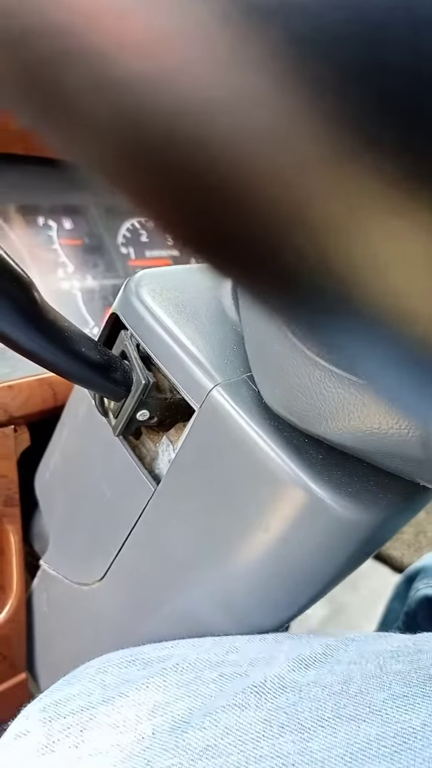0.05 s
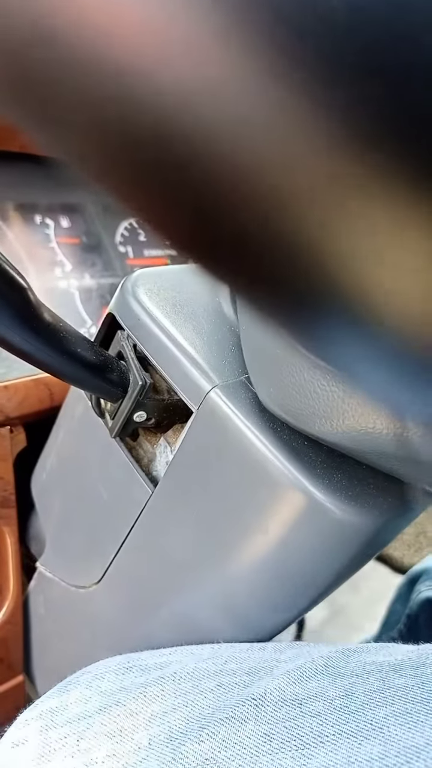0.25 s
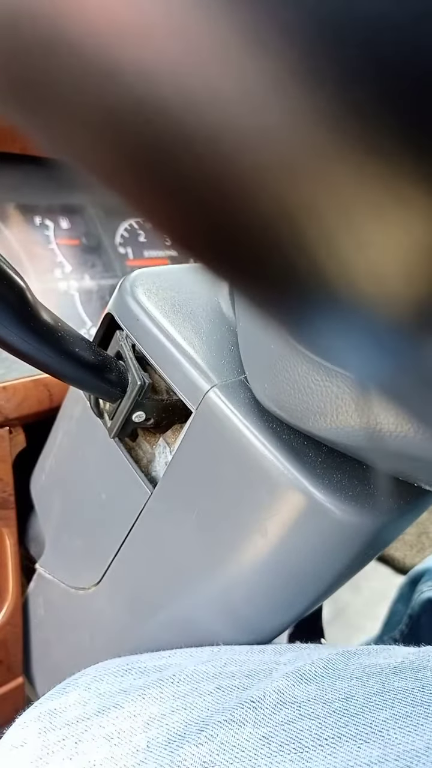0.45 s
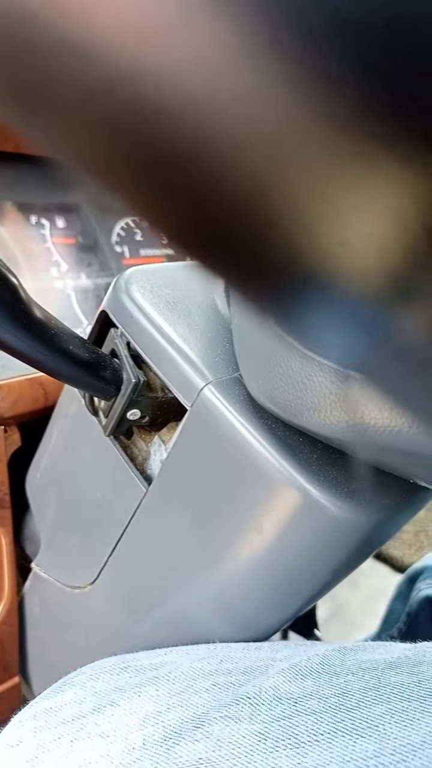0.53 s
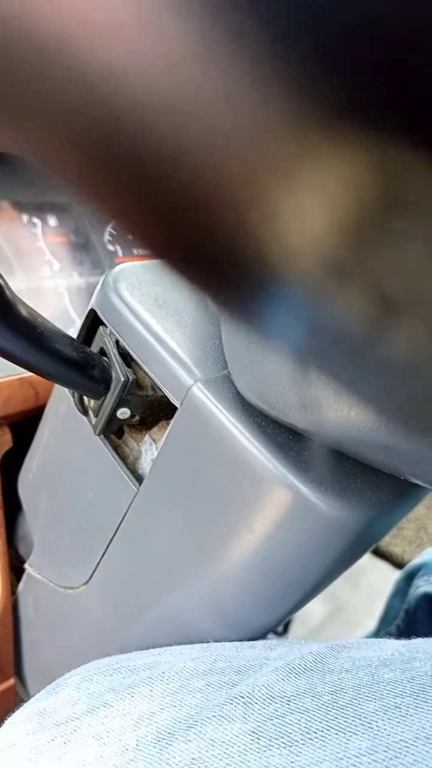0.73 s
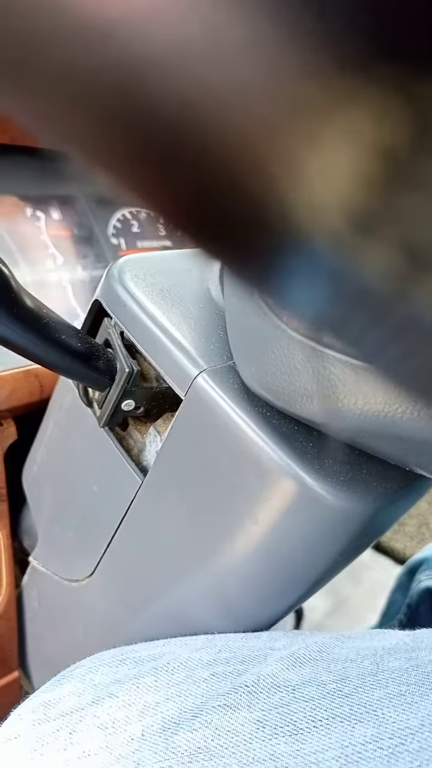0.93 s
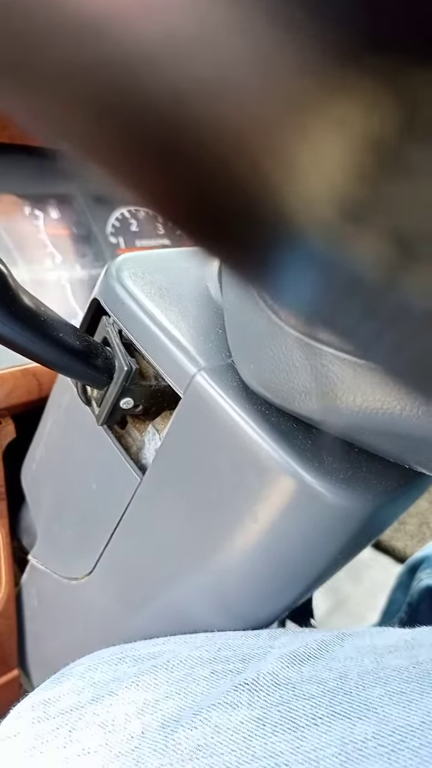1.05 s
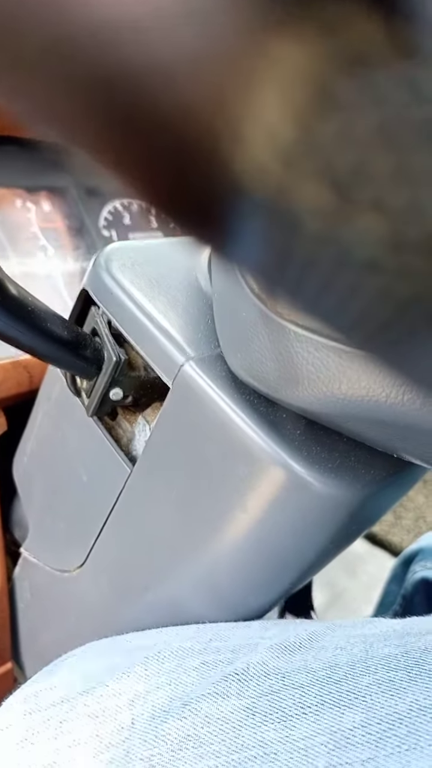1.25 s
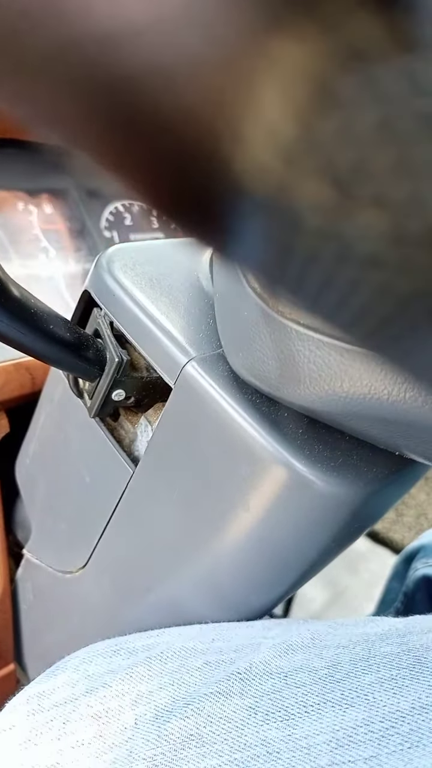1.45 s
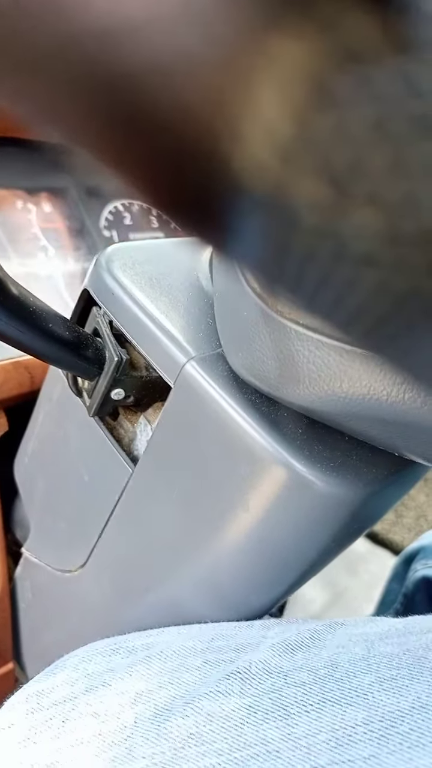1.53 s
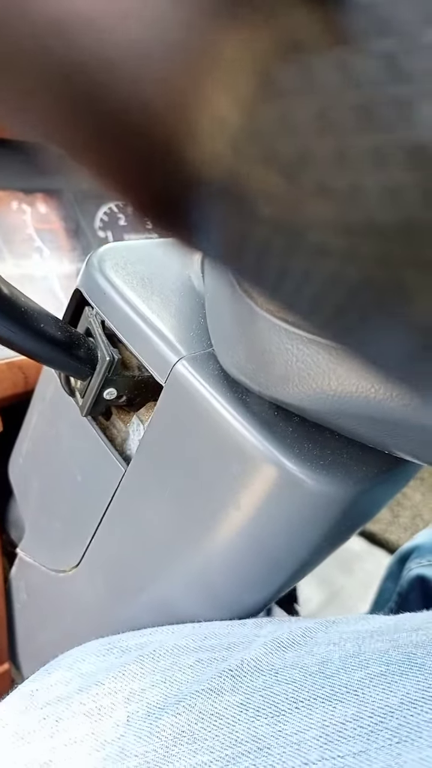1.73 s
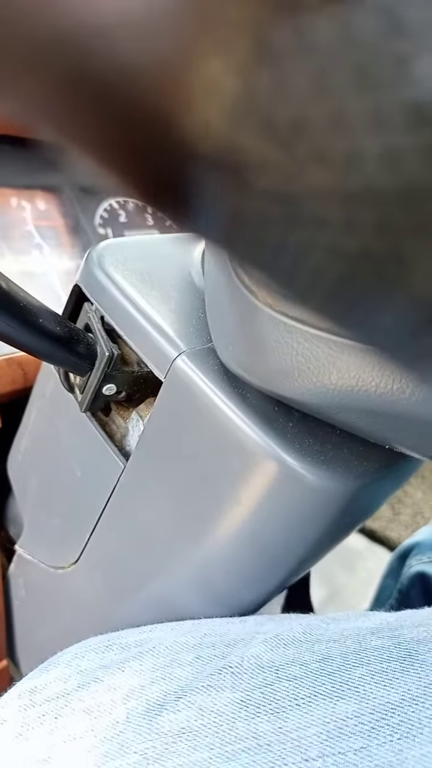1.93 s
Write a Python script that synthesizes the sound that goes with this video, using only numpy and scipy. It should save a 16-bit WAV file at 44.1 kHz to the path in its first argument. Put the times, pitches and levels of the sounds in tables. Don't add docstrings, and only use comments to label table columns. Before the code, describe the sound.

A diesel engine idles throughout, low and clattering, heard inside a vehicle cab; a small crisp switch tick comes early, then a louder plastic lever snap with a thud and quick second knock, close to the microphone.

```python
import sys
import numpy as np
from scipy import signal
from scipy.fft import rfft, irfft, next_fast_len
from scipy.io import wavfile
from scipy.ndimage import uniform_filter1d, map_coordinates

SR = 44100
rng = np.random.default_rng(int(sys.argv[2]) if len(sys.argv) > 2 else 0)


def bounce(signal):
    frames = np.transpose(np.atleast_2d(signal))
    limited = np.clip(frames, -1, 1)
    pcm = np.round(limited * 32767).astype(np.int16)
    wavfile.write(sys.argv[1], SR, pcm)


def invert_db(level):
    return 10 ** (np.asarray(level, dtype=float) / 20)


N = 88200
T = np.arange(N) / SR

# t/s, rumble level/dB
SHAKE = [(0, -36.5), (.12, -43.5), (.25, -33), (.33, -39), (.42, -33), (.55, -43), (.67, -34), (.75, -35.5),
         (.86, -32), (.96, -35.5), (1.15, -40.5), (1.35, -39.5), (1.45, -34.5), (1.58, -39), (1.7, -37.5),
         (1.85, -36.5), (1.93, -40.5), (2, -36)]
# f/Hz, density level/dB per Hz
CABIN_RUMBLE = [(15, -71), (25, 2), (48, -7), (107, 6), (178, -7.5), (220, -4), (314, -3.5), (396, -8),
                (1000, -20), (1300, -21), (2200, -120)]
# f/Hz, density level/dB per Hz
BLOCK_WASH = [(210, -66), (350, 0), (891, -5.5), (1570, -11.5), (1840, -7.5), (3060, -12), (7660, -35.5),
              (12900, -52), (15400, -75)]
CABIN_PATCH_DB = 1
BLOCK_DB, BLOCK_PATCH_DB = -41, 3

# t/s, level/dB
BLOWER_HUM = [(0, -40), (.07, -44), (.22, -38), (.3, -43), (.38, -37.5), (.47, -46), (.56, -34.5),
              (.67, -47), (.72, -38.5), (.86, -38), (.93, -40.5), (1.0, -35.5), (1.15, -49), (1.34, -44.5),
              (1.46, -37.5), (1.69, -39), (1.92, -46), (2, -37.5)]
BLOWER_HZ, BLOWER_OVERTONE_DB = 111.6, -6

# multiple of the firing rate/1, rms level/dB
FIRING_ORDERS = [(4, -45), (5, -41), (6, -51), (8, -49.5), (10, -49), (11, -49.5), (12, -52.5), (13, -55),
                 (14, -49), (15, -47), (16, -55), (18, -59), (21, -56.5), (26, -57.5), (37, -54.5),
                 (47, -55.5)]
FIRING_HZ, FIRST_FIRING_S = 19.16, .0535
TONE_WANDER_DB, TONE_DRIFT_RAD = 1, 0.18
BOOM_SHARE = .7

# t/s, level/dB
BITE = [(0, -2), (.27, 3.5), (.5, -4), (.7, 0), (.9, -3), (1.2, -5), (1.32, 1), (1.53, -1), (1.73, 3.5),
        (1.84, -1), (1.94, 1.5)]
# f/Hz, width/Hz, level/dB
KNOCK_MODES = [(658, 40, 2), (895, 182, 0.5), (1304, 156, 3.5), (2113, 246, -1), (3170, 280, -7),
               (4120, 260, -7)]
CYLINDER_DB = [
    [2, -1, 1, 1],
    [3, -1.2, 0, -0.99],
]
KNOCK_DB, KNOCK_RISE_S, KNOCK_T60_S, KNOCK_SCATTER_DB = -45.5, 0.0051, 0.1, 1.2
VALVE_LAG, VALVE_DB = 0.46, -11.5
BITE_TO_KNOCK = .6

RING_CYLINDER_DB = [0, -9, -7, -7]
RING_HZ, RING_DB, RING_T60_S, RING_WAVER_RAD = 3010, -54, .06, 1.1

# f/Hz, density level/dB per Hz
CLATTER = [(2000, -28), (3500, 2), (5100, -8.5), (7000, -18), (9000, -29.5), (10800, -25.5), (12300, -19.5),
           (13800, -24.5), (15500, -40)]
CLATTER_DB, CLATTER_RISE_S, CLATTER_T60_S = -54.5, 0.0076, 0.16
CLATTER_SCATTER_DB, CLATTER_PATCH_DB = -1, 1

# t/s, level/dB, half length/s, f/Hz
RUSTLES = [
    (0.17, -54, 0.0079, 7500),
    (0.323, -54, 0.0016, 7400),
    (0.709, -49, 0.0088, 6560),
    (.706, -60, .007, 12500),
]
RUSTLE_WIDTH_HZ = 1700

# f/Hz, level/dB, t60/s
TICK_MODES = [(3600, 0, .012), (3950, -11, .02), (4330, -6, .008), (6290, -19, .01), (7320, -20, .01)]
# delay t/s, level/dB
TICK_ECHOES = [
    (0, -15),
    (.0011, 0),
    (.0037, -14),
    (.0057, -17),
    (.0085, -19),
    (.0125, -27),
]
TICK_S, TICK_RISE_S, TICK_DB = .3435, .0004, -10
TICK_LOW_HZ = 2900
TICK_CRACK_DB, TICK_CRACK_T60_S, TICK_CRACK_HZ = -29, 0.013, 8000

# t/s, rattle level/dB
SNAP = [
    (1.085, -45),
    (1.0875, -33),
    (1.0895, -13.5),
    (1.094, -10),
    (1.1, -11.5),
    (1.106, -13),
    (1.114, -22),
    (1.123, -40),
    (1.135, -31),
]
# t/s, rattle level/dB
SETTLE = [
    (1.125, -42),
    (1.137, -29),
    (1.144, -29),
    (1.151, -23),
    (1.1555, -14.5),
    (1.159, -20.5),
    (1.167, -27.5),
    (1.175, -36),
    (1.19, -55),
]
# f/Hz, density level/dB per Hz
SNAP_CRACK = [(300, -33), (450, -10), (820, -13), (1500, -19.5), (2400, -9), (7000, -18.5), (8300, -33),
              (13500, -49), (15500, -56)]
# f/Hz, density level/dB per Hz
SETTLE_CRACK = [(400, -13), (900, -13.5), (1300, -9.5), (2600, -4.5), (3600, -13), (6500, -18), (8300, -25),
                (13500, -32.5), (15500, -37)]
# f/Hz, width/Hz, level/dB
LEVER_BODY = [(776, 44, -14), (1230, 81, -4), (1917, 45, -2), (2150, 45, -3), (2182, 42, 7),
              (2740, 35, -20), (2985, 70, -2), (3200, 27, 2.5), (3360, 15, -1.5), (3740, 28, 0.5),
              (4485, 54, -6), (6110, 81, -10)]
# f/Hz, level/dB, t60/s
HOUSING = [(193, -21.5, 0.13), (431, -22.5, 0.072), (514, -28, 0.081), (573, -25.5, 0.091),
           (786.3, -13.5, 0.081), (852, -18, 0.094)]
# f/Hz, level/dB, t60/s
STOP = [(1290, -21, 0.026), (2700, -16.5, 0.016), (3300, -21, 0.011)]
LEVER_WIDEN, SNAP_RING_DB, SETTLE_RING_DB = 1.5, 0.5, -19
CONTACTS_PER_S, CONTACT_SPREAD_DB = 9000, 1.5
THUD_S, STOP_S = 1.089, 1.1548

MIC_LOW_HZ, MIC_TOP, TOP_HZ = 42.7, 1, 15750


def unit(x):
    return x / np.sqrt(np.mean(x ** 2) + 1e-20)


def curve(rows):
    s, v = np.transpose(rows)
    return np.interp(T, s, v)


def wobble(rate):
    return map_coordinates(rng.standard_normal(200), [np.arange(N) * rate / SR])


def filtered(x, response):
    m = next_fast_len(N + SR // 2)
    return irfft(rfft(x, m) * response(np.fft.rfftfreq(m, 1 / SR)), m)[:N]


def colour(points):
    f, db = np.transpose(points)
    return lambda hz: invert_db(np.interp(np.log(hz + 1), np.log(f + 1), db))


def resonant(modes, widen=1):
    def response(f):
        total = 0
        for k, (centre, width, db) in enumerate(modes):
            damping = 1j * f * width * widen
            total = total + (-1) ** k * invert_db(db) * damping / (centre ** 2 - f * f + damping)
        return total
    return response


def ring_down(modes, since):
    return sum(invert_db(db - 60 * since / t60) * np.sin(2 * np.pi * hz * since) for hz, db, t60 in modes)


def rush(spectrum, patchy_db):
    z = signal.stft(rng.standard_normal(N), nperseg=512)[2]
    field = uniform_filter1d(rng.standard_normal(z.shape), size=4, axis=0)
    field = uniform_filter1d(field, size=12, axis=1)
    noise = signal.istft(z * invert_db(patchy_db * unit(field)), nperseg=512)[1][:N]
    return unit(filtered(noise, colour(spectrum)))


def unsteady_tone(hz, db):
    phase = 2 * np.pi * (hz * T + rng.random()) + TONE_DRIFT_RAD * wobble(3.3)
    return np.sqrt(2) * invert_db(db) * np.sin(phase)


def firings(cylinder_db, scatter_db, rise_s, t60_s, lag=0):
    turns = (T - FIRST_FIRING_S) * FIRING_HZ - lag + 4
    size = invert_db(np.resize(cylinder_db, 64) + scatter_db * rng.standard_normal(64))
    k = turns.astype(int)
    since = turns % 1 / FIRING_HZ

    def shape(s):
        return (1 - np.exp(-(s / rise_s) ** 2)) * invert_db(-60 * s / t60_s)
    return size[k] * shape(since) + size[k - 1] * shape(since + 1 / FIRING_HZ)


def rumble_and_wash():
    rumble = invert_db(curve(SHAKE)) * rush(CABIN_RUMBLE, CABIN_PATCH_DB)
    return rumble + invert_db(BLOCK_DB) * rush(BLOCK_WASH, BLOCK_PATCH_DB)


def blower():
    hum_db = curve(BLOWER_HUM)
    hum = unsteady_tone(BLOWER_HZ, hum_db)
    return hum + unsteady_tone(2 * BLOWER_HZ, hum_db + BLOWER_OVERTONE_DB)


def firing_boom():
    hum_db = curve(BLOWER_HUM)
    swell = BOOM_SHARE * (hum_db - hum_db.mean())
    boom = np.zeros(N)
    for k, db in FIRING_ORDERS:
        level = db + TONE_WANDER_DB * wobble(3.5) + swell * (k < 7)
        boom += unsteady_tone(k * FIRING_HZ, level)
    return boom


def combustion_knock():
    blows = firings(CYLINDER_DB[0], KNOCK_SCATTER_DB, KNOCK_RISE_S, KNOCK_T60_S)
    valves = firings([0], KNOCK_SCATTER_DB, KNOCK_RISE_S, KNOCK_T60_S, lag=VALVE_LAG)
    blows = blows + invert_db(VALVE_DB) * valves
    knock = unit(filtered(blows * rng.standard_normal(N), resonant(KNOCK_MODES)))
    return invert_db(KNOCK_DB + BITE_TO_KNOCK * curve(BITE)) * knock


def ringing_part():
    wavering = np.sin(2 * np.pi * RING_HZ * T + RING_WAVER_RAD * wobble(55))
    ring = unit(firings(RING_CYLINDER_DB, 1.7, 0.0042, RING_T60_S) * wavering)
    return invert_db(RING_DB + curve(BITE)) * ring


def injector_clatter():
    pulses = firings(CYLINDER_DB[1], CLATTER_SCATTER_DB, CLATTER_RISE_S, CLATTER_T60_S)
    return invert_db(CLATTER_DB) * unit(pulses * rush(CLATTER, CLATTER_PATCH_DB))


def rustles():
    total = np.zeros(N)
    for s, db, half, hz in RUSTLES:
        brush = filtered(rng.standard_normal(N), lambda f: np.exp(-((f - hz) / RUSTLE_WIDTH_HZ) ** 2))
        total += invert_db(db) * np.exp(-((T - s) / half) ** 2) * unit(brush)
    return total


def switch():
    t = np.maximum(T - TICK_S, 0)
    crack = unit(filtered(rng.standard_normal(N), lambda f: f ** 4 / (f ** 4 + TICK_CRACK_HZ ** 4)))
    crack = invert_db(TICK_CRACK_DB - 60 * t / TICK_CRACK_T60_S) * crack
    onset = 1 - np.exp(-(t / TICK_RISE_S) ** 2)
    tick = invert_db(TICK_DB) * (ring_down(TICK_MODES, t) + crack) * onset

    def path(f):
        echoes = sum(invert_db(db) * np.exp(-2j * np.pi * f * s) for s, db in TICK_ECHOES)
        return f ** 6 / np.sqrt(f ** 12 + TICK_LOW_HZ ** 12) * echoes
    return filtered(tick, path)


def rattle(stroke, crack, ring_db):
    hits = (rng.random(N) < CONTACTS_PER_S / SR) * rng.standard_normal(N)
    hits = hits * invert_db(CONTACT_SPREAD_DB * rng.exponential(size=N))
    push = invert_db(curve(stroke)) * (T > stroke[0][0]) * (T < stroke[-1][0])

    def through(response):
        return filtered(hits * push, response) / np.sqrt(np.mean(filtered(hits, response) ** 2))
    ring = invert_db(ring_db) * through(resonant(LEVER_BODY, LEVER_WIDEN))
    return 0.71 * (through(colour(crack)) + ring)


def lever():
    snap = rattle(SNAP, SNAP_CRACK, SNAP_RING_DB)
    since = np.maximum(T - THUD_S, 0)
    thud = ring_down(HOUSING, since) * (1 - np.exp(-since / 0.002))
    settle = rattle(SETTLE, SETTLE_CRACK, SETTLE_RING_DB)
    stop = ring_down(STOP, np.maximum(T - STOP_S, 0))
    return snap + thud + settle + stop


def scene():
    engine = rumble_and_wash() + firing_boom() + combustion_knock() + ringing_part() + injector_clatter()
    return (engine + blower() + rustles() + switch() + lever())[None]


def top_cut(x):
    return signal.sosfilt(signal.butter(12, 15530, fs=SR, output="sos"), x)


def record(dry):
    x = filtered(dry[0], lambda f: (1j * f / (MIC_LOW_HZ + 1j * f)) ** 3 * (f < TOP_HZ))
    rounded = x / (1 + np.abs(x / MIC_TOP) ** 6) ** (1 / 6)
    return top_cut(rounded[None])


dry = scene()
out = record(dry)
bounce(out)
```